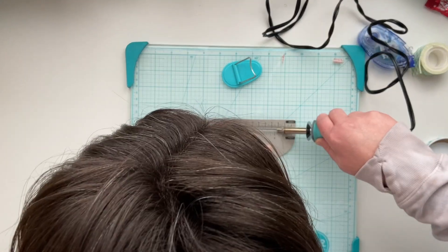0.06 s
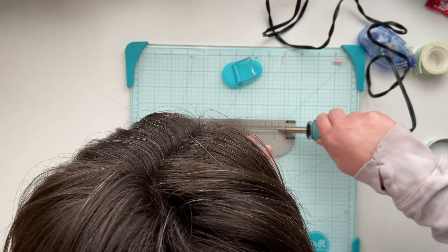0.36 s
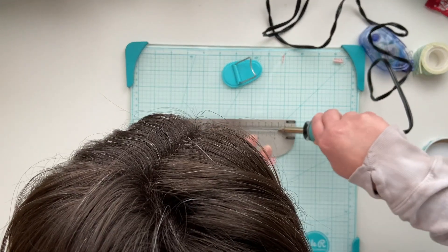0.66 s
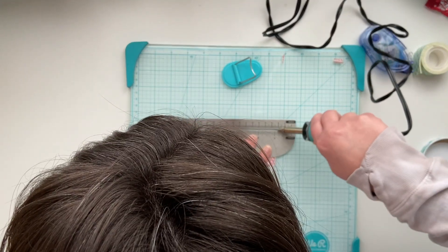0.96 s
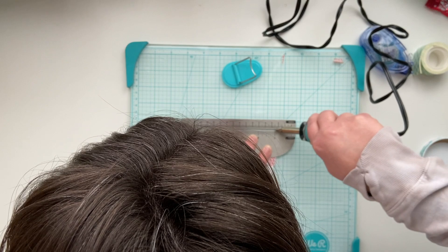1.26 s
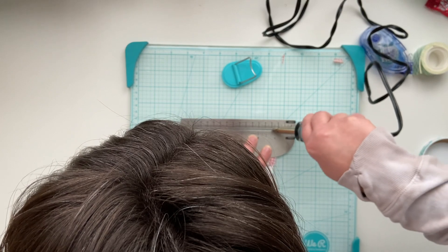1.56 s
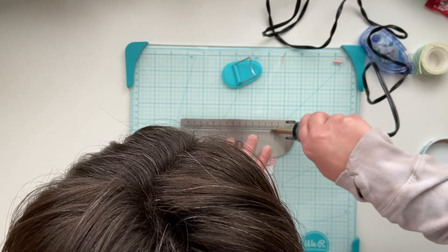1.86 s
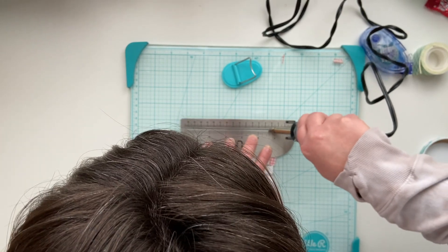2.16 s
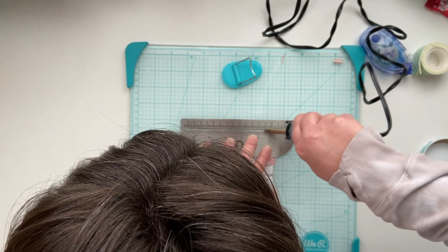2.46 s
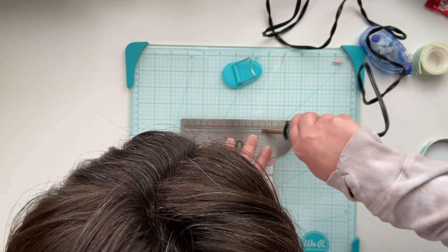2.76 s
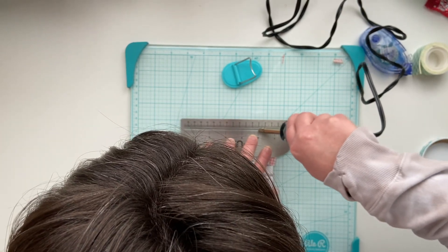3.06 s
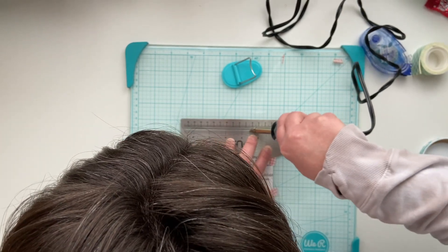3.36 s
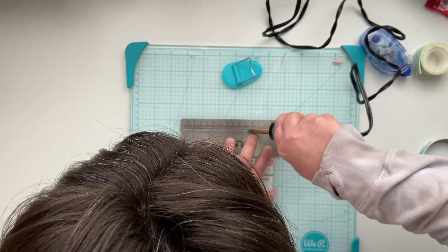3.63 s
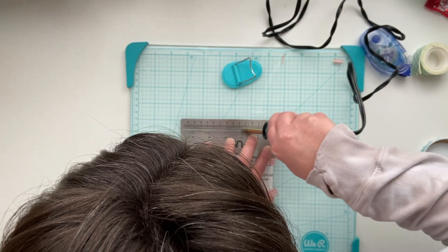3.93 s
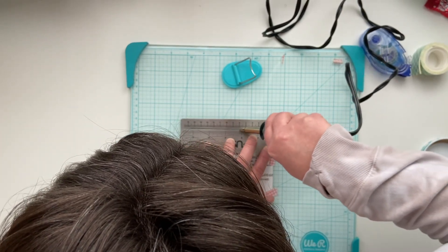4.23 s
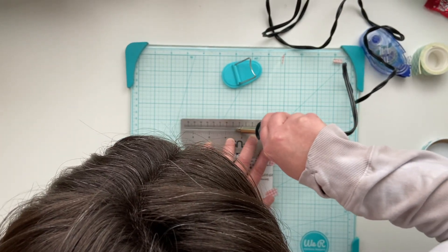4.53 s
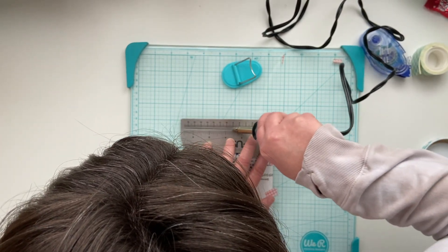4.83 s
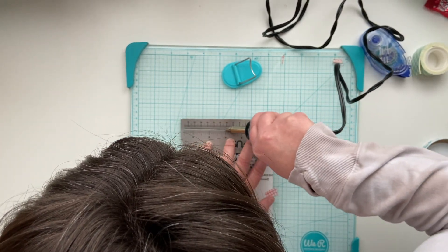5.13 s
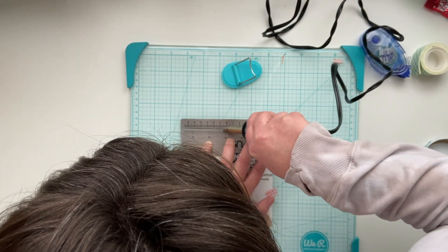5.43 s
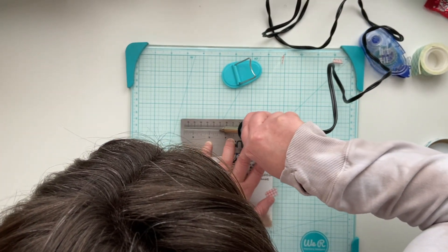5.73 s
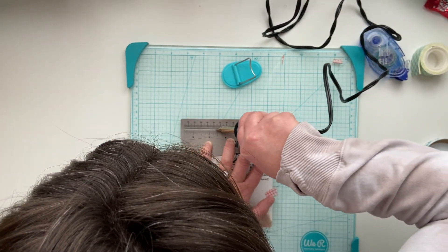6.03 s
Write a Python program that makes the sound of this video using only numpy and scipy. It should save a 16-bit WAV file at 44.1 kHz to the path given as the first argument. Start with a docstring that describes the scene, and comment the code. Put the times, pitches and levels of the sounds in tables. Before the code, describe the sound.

A handheld sealing tool is set against a steel ruler with a few sharp metal ticks and a soft bump. After faint rubbing, its toothed wheel rolls over plastic along the ruler's edge, making uneven clicks and short gritty scrapes, sometimes in quick spurts. Each click thumps the desk dully through a mat, and a few catches squeak briefly. The microphone is close, in a small quiet room.

```python
"""A desk in a small, quiet room, the microphone hanging close above it.
A heat-sealing tool is set down against a steel ruler, then its toothed wheel is pushed along over a
plastic pocket. Each tooth scrapes up to a slip, knocks the ruler and drops onto the mat, which thumps
the desk; at times the wheel runs in quick spurts. Rubs, squeaks and metal ticks sit over low room tone."""
import sys
import numpy as np
from scipy import signal
from scipy.fft import rfft, irfft, next_fast_len
from scipy.io import wavfile
from scipy.ndimage import uniform_filter1d, map_coordinates

SR = 44100
rng = np.random.default_rng(int(sys.argv[2]) if len(sys.argv) > 2 else 0)


def bounce(signal):
    """Save signal as a 16-bit WAV file at the path given by the first command-line argument."""
    frames = np.transpose(np.atleast_2d(signal))
    limited = np.clip(frames, -1, 1)
    pcm = np.round(limited * 32767).astype(np.int16)
    wavfile.write(sys.argv[1], SR, pcm)


N = 268779
AGE = np.arange(SR // 2) / SR  # seconds since a blow

# slips of the wheel's teeth: start_s, force_db
TOOTH_SLIPS = [(1.398, -41), (1.728, -34.5), (1.949, -33), (2.124, -29.5), (2.177, -28), (2.225, -28),
               (2.343, -34), (2.496, -31), (2.652, -27.5), (2.77, -29.5), (2.916, -28.5), (3.012, -26),
               (3.041, -29), (3.072, -30), (3.109, -29), (3.137, -26), (3.163, -28), (3.201, -27),
               (3.345, -33), (3.518, -34), (3.727, -29.5), (3.756, -32), (3.782, -25.5), (3.811, -27.5),
               (3.841, -27.5), (3.919, -35), (4.116, -28), (4.233, -30.5), (4.337, -30), (4.388, -31),
               (4.472, -31), (4.616, -30), (4.69, -33.5), (4.8, -32.5), (4.853, -29.5), (4.959, -31),
               (5.001, -29.5), (5.03, -25.5), (5.054, -26.5), (5.09, -31.5), (5.21, -33), (5.38, -30.5),
               (5.445, -32), (5.513, -31.5), (5.61, -31), (5.741, -30.5), (5.831, -32), (5.946, -34),
               (6.077, -28)]
# a tooth grinds along the ruler's edge and catches on it: start_s, level_db, pitch_hz
EDGE_CATCHES = [(1.726, -41.5, 1210), (2.1752, -23.5, 1120), (2.225, -31, 1130), (2.6515, -32.5, 1440),
                (3.0405, -23, 1060), (3.1625, -33, 1220), (3.7555, -23, 980), (3.8405, -26.5, 955),
                (4.336, -37.5, 1750), (4.6905, -26, 1040), (5.0303, -32.5, 1010), (5.6103, -39.5, 1300)]


def ruler():
    """Teeth knock the ruler, harder, sharper and lower at speed; catches and taps strike it outright."""
    # the tool taps against the ruler: start_s, level_db, pitch_hz
    taps = [(0.005, -43.5, 1140), (0.029, -36, 890), (0.229, -33.5, 1010), (0.24, -28.5, 834),
            (0.297, -47.5, 870), (0.458, -44, 1030), (0.679, -44, 1030), (1.332, -55, 1140),
            (4.082, -38.5, 1010)]
    out = np.zeros(N)
    for (s, force_db), speed in zip(TOOTH_SLIPS, wheel_speed()):
        blow = knock(pitch_hz=between(1220, 936, speed), octaves=0.48,
                     spill=between(0.32, 0.12, speed), attack_s=between(0.0016, 0.000205, speed))
        add(out, s - .001, amp(force_db + between(-17, -4.5, speed)) * blow)
    for s, db, pitch_hz in EDGE_CATCHES:
        add(out, s - .001, amp(db) * knock(pitch_hz, octaves=0.44, spill=0.11, attack_s=0.00098))
    for s, db, pitch_hz in taps:
        add(out, s - .0005, amp(db) * knock(pitch_hz, octaves=0.46, spill=0.16, attack_s=0.00014))
    return out


def knock(pitch_hz, octaves, spill, attack_s, rattle_db=0.5):
    """A blow favours the ruler's modes near one pitch and spills into the rest; the ruler chatters."""
    # the steel ruler lying on the mat: freq_hz, level_db, t60_s
    modes = [(281.4, -11.5, 0.1), (390.4, -1, 0.045), (504, -6, 0.047), (729, -2.5, 0.022),
             (817, -0.5, 0.019), (1045, -17.5, 0.01), (1099, -4, 0.023), (1140, -6, 0.029),
             (1474, -13, 0.038), (1520, -3, 0.0069), (1790, -4.5, 0.024), (2030, -8.5, 0.03),
             (2685, -22.5, 0.042), (3650, -16.5, 0.022), (4550, -48, 0.017)]
    hz = np.transpose(modes)[0]
    weight = spill + np.exp(-(np.log2(hz / pitch_hz) / octaves) ** 2)
    signs = (-1) ** np.arange(len(hz))
    body = (weight * signs) @ ring(modes, scatter_db=2.5, detune=0.022)
    jitter = unit(uniform_filter1d(rng.standard_normal(len(AGE)), size=96))
    chatter = uniform_filter1d(amp(rattle_db * jitter), size=24)
    onset = 1 - np.exp(-AGE / attack_s)
    return burst(body * chatter * onset, length_s=0.01)


def wheel_speed(spurt_gap_s=0.041, softness_s=0.0089):
    """Pace at each tooth, from 0 (creeping) to 1 (a spurt, where teeth follow closely)."""
    gaps = np.diff(np.transpose(TOOTH_SLIPS)[0], prepend=-np.inf, append=np.inf)
    nearest = np.minimum(gaps[:-1], gaps[1:])
    return .5 + .5 * np.tanh((spurt_gap_s - nearest) / softness_s)


def desk(rebound_s=0.01106, rebound_db=-24):
    """Each tooth thumps the desk through the soft mat, which springs back and bumps it again."""
    # the desk and mat: freq_hz, level_db, t60_s
    modes = [(25.45, -26.5, 0.43), (43.9, -28.5, 0.14), (77.4, -26.5, 0.13), (104, -72, 0.0684),
             (216, -28.5, 0.084), (293.5, -27, 0.095), (392, -25.5, 0.11), (472, -26, 0.13)]
    # the tool is set down on the mat: start_s, level_db
    landings = [(0.031, -51), (0.24, -35), (0.678, -49)]
    contacts_s = np.linspace(0.0017, 0.0013, len(TOOTH_SLIPS))  # the mat gives less along the way
    out = np.zeros(N)
    for (s, db), contact_s in zip(TOOTH_SLIPS, contacts_s):
        thump = pushed(ring(modes, scatter_db=1.0, detune=0.041).sum(0), contact_s)
        add(out, s - .001, amp(db) * burst(thump, length_s=0.058))
        rebound = pushed(ring(modes, scatter_db=7.5, detune=0.064)[4:].sum(0), contact_s=0.00054)
        add(out, s + rebound_s, amp(db + rebound_db) * burst(rebound, length_s=0.012))
    for s, db in landings:
        thump = pushed(ring(modes, scatter_db=7.0, detune=0.019)[2:].sum(0), contact_s=0.0019)
        add(out, s, amp(db) * burst(thump, length_s=0.022))
    return out


def friction(scrape_db=-9.5, hiss_db=-21.5):
    """Scrape and hiss swell before each tooth slips, in step with its force, and before each catch."""
    # colour of the scrape and the hiss, early and late in the wheel's run: freq_hz, density_db
    scrape_early = [(200, -1.5), (400, -7), (600, -4.5), (790, -2.5), (960, -1.5), (1190, 4), (1600, -13),
                    (1830, -0.5), (2050, -12.5), (2450, -20.5), (4000, -21.5), (7000, -46), (16000, -47)]
    scrape_late = [(200, -44), (400, -8), (600, -5.5), (790, 11), (980, -11), (1130, -9), (1430, 1.5),
                   (1750, -3), (2070, 3), (2600, -22), (4000, -15), (7000, -30), (16000, -52)]
    hiss_early = [(1500, -27), (2600, 11), (3100, 8.5), (3500, -11), (4400, 7.5), (5600, 0.5), (6600, -1),
                  (8500, -2), (10300, -4), (11500, -11), (13000, -8), (16000, -34)]
    hiss_late = [(1500, -52), (2800, 8.5), (3300, -21.5), (4400, -8.5), (5100, -7), (5700, 4), (6600, -8),
                 (8800, -8), (10400, -1), (11500, -14), (13000, -14), (16000, -20)]
    slip_s, force_db = np.transpose(TOOTH_SLIPS)
    catch_s, catch_db, _ = np.transpose(EDGE_CATCHES)
    speed = wheel_speed()
    rise_s = between(0.062, 0.051, speed)
    easing_db = -2.5 * speed  # a running wheel scrapes less
    graze = swells(catch_s, catch_db, rises_s=0.058, fall_s=.025, lead_s=.001)
    scrape_level = swells(slip_s, force_db + scrape_db + easing_db, rise_s, fall_s=0.072, lead_s=0.0036)
    hiss_level = swells(slip_s, force_db + hiss_db, rise_s, fall_s=0.036, lead_s=0.0003)
    scrape = patchy(sliding(scrape_early, scrape_late, grain_db=3.5), depth_db=3.5)
    hiss = patchy(sliding(hiss_early, hiss_late, grain_db=5.0), depth_db=3.5)
    return np.hypot(scrape_level, amp(-8) * graze) * scrape + np.hypot(hiss_level, amp(-29) * graze) * hiss


def swells(times_s, levels_db, rises_s, fall_s, lead_s):
    """Envelope of friction that peaks just ahead of each slip; rise and fall times span 60 dB."""
    t, power = np.arange(N) / SR, np.zeros(N)
    for s, db, rise_s in np.broadcast(times_s, levels_db, rises_s):
        near = slice(max(0, int(s * SR) - SR // 8), int(s * SR) + SR // 8)
        past_peak = t[near] - s + lead_s
        power[near] += amp(db - 60 * np.maximum(-past_peak / rise_s, past_peak / fall_s)) ** 2
    return np.sqrt(power)


def sliding(early, late, grain_db, midway_s=3.72, spread_s=0.47):
    """Grainy friction whose colour shifts as the wheel travels along the ruler."""
    travel = .5 + .5 * np.tanh((np.arange(N) / SR - midway_s) / spread_s)
    return np.sqrt(1 - travel) * noise(early, grain_db) + np.sqrt(travel) * noise(late, grain_db)


def patchy(x, depth_db):
    """Small resonances come and go as the contact point moves."""
    spectra = signal.stft(x, nperseg=512)[2]
    patches = uniform_filter1d(rng.standard_normal(spectra.shape), size=3, axis=0)
    patches = unit(uniform_filter1d(patches, size=12, axis=1))
    return unit(signal.istft(spectra * amp(depth_db * patches), nperseg=512)[1][:len(x)])


def rubbing(drag_db=-34.5, resting_db=-72):
    """The tool drags along the ruler: in light strokes, and whenever the wheel turns."""
    # light strokes: centre_s, level_db, half_width_s
    rubs = [(0.094, -54, 0.014), (0.333, -50, 0.017), (0.49, -51.5, 0.018), (0.676, -55, 0.056),
            (0.867, -51, 0.026), (1.072, -57.5, 0.075), (1.232, -48.5, 0.021), (1.274, -51, 0.012),
            (1.367, -51, 0.017), (1.846, -53.5, 0.012), (2.16, -46, 0.027), (2.992, -50, 0.067),
            (3.615, -50, 0.0097)]
    # colour of the rubbing, early and late in the run: freq_hz, density_db
    rub_early = [(200, -21.5), (450, 0), (620, -8.5), (790, 4.5), (950, -4), (1160, 3.5), (1420, -6),
                 (1640, -16), (1900, -5.5), (2350, -22.5), (3100, -17.5), (4300, -32), (5500, -23),
                 (16000, -53)]
    rub_late = [(200, -20), (450, 1.5), (620, -8), (790, 7.5), (950, -9.5), (1160, 2.5), (1420, -7.5),
                (1640, -3.5), (1900, -2), (2350, -20.5), (3100, -13), (4300, -27), (5500, -21.5),
                (16000, -67)]
    turning = np.max([amp(db + drag_db) * bump(s, half_width_s=.14) for s, db in TOOTH_SLIPS], axis=0)
    strokes = sum(amp(db) * bump(s, half_width_s) for s, db, half_width_s in rubs)
    level = np.sqrt(amp(resting_db) ** 2 + turning ** 2 + strokes ** 2)
    rub = sliding(rub_early, rub_late, grain_db=2)
    flutter = unit(amp(2.8 * wobble(rate_hz=90)))
    return level * rub * flutter


def squeaks(waver=0.047):
    """Stick and slip locks onto one resonance for a few cycles."""
    # brief squeaks and a low groan: centre_s, level_db, pitch_hz, half_width_s
    stick_slips = [(0.508, -44, 290, 0.018), (2.171, -33, 1150, 0.0039), (2.177, -12, 1160, 0.003),
                   (4.03, -44.5, 797, 0.0091), (4.959, -41, 2017, 0.0064), (5.608, -37.5, 1400, 0.0088)]
    out = np.zeros(N)
    t = AGE[:SR // 5] - .1
    for s, db, hz, half_width_s in stick_slips:
        drift = unit(uniform_filter1d(rng.standard_normal(len(t)), size=200))
        cycles = np.cumsum(hz * (1 + waver * drift)) / SR
        tone = np.sqrt(2) * np.sin(2 * np.pi * (cycles - cycles[len(t) // 2]))
        add(out, s + t[0], amp(db) * np.exp(-(t / half_width_s) ** 2) * tone)
    return out


def tip(snap_db=1, metal_db=-6):
    """Hard contacts give a dry snap and a brief bright ring of the tip."""
    # ticks of metal on metal: start_s, level_db
    clicks = [(0.0034, -36), (0.0248, -45.5), (0.228, -33), (0.2373, -28.5), (0.238, -37.5), (0.384, -57),
              (0.46, -59), (0.485, -56.5), (0.533, -59.5), (3.213, -55), (3.823, -53.5), (4.401, -60),
              (4.482, -54)]
    # the metal tip: freq_hz, level_db, t60_s
    modes = [(1920, -2, 0.013), (2700, -20, .012), (3060, 1, .015), (3650, -4, .014), (4500, -3, 0.017),
             (4750, 17, .018), (4780, -5, .014), (7050, 7, 0.066), (10200, -8, .015), (11900, -18, 0.023),
             (12000, -16, .022), (13400, -3, 0.031), (13700, 7, 0.024), (15300, -16, 0.017)]
    # colour of the snap: freq_hz, density_db
    snap_colour = [(400, -26), (900, 4.5), (1900, 5), (2500, -2.5), (3300, 4), (3900, -5), (4400, 3),
                   (5100, 2), (6200, -12), (9000, -10), (11500, -6.5), (12700, 2), (14000, -19),
                   (16000, -11)]
    out, grit = np.zeros(N), noise(snap_colour)
    decay = amp(-60 * AGE / 0.029) + amp(-11 - 60 * AGE / 0.04)
    for s, db in clicks:
        snap = np.roll(grit, -round(s * SR))[:len(AGE)] * decay
        metal = ring(modes, scatter_db=5, detune=0.00091).sum(0)
        add(out, s, amp(db + snap_db) * burst(snap, length_s=0.0042))
        add(out, s, amp(db + metal_db) * burst(metal, length_s=0.0022))
    return out


def room(x, wet_db, delay_s):
    """The small room's short diffuse answer, which shifts as the hands and head move."""
    # reverberation: freq_hz, t60_s
    decay_times = [(100, 0.59), (1000, 0.15), (4000, 0.21), (14000, 0.1)]
    out, block = np.zeros(N), SR // 4
    for start in range(0, N, block):
        hz, t, spectra = signal.stft(rng.standard_normal(SR // 3), SR, nperseg=256)
        decay = amp(-60 * t / along(decay_times, hz)[:, None])
        tail = signal.istft(spectra * decay, SR, nperseg=256)[1]
        answer = signal.fftconvolve(x[start:start + block], tail / np.linalg.norm(tail))
        add(out, start / SR + delay_s, answer)
    return amp(wet_db) * out


def room_tone():
    """Low rumble and a faint even hiss, with a low drone that dies away at the start."""
    # colour of each layer: freq_hz, density_db
    drone = [(25, -15), (50, -3), (75, 1), (110, -1.5), (160, -7), (200, -12.5), (280, -15.5), (450, -23.5),
             (1500, -54)]
    rumble = [(15, 10), (26, 7), (48, 5), (70, -2.5), (100, 0.5), (125, -14), (150, -4.5), (200, -12),
              (260, -16), (500, -22.5), (1500, -46)]
    air = [(30, 4), (250, 3.5), (600, 3.5), (1500, -4), (2500, -4.5), (5000, -9), (14000, -11.5),
           (16000, -14.5)]
    fade = bump(0, half_width_s=1)
    return amp(-50) * fade * noise(drone) + amp(-51.5) * noise(rumble) + amp(-65.5) * noise(air)


def ring(modes, scatter_db, detune):
    """One row per decaying mode, at strengths and pitches that vary from blow to blow."""
    hz, db, t60 = np.transpose(modes)[:, :, None]
    strength, shift = rng.standard_normal((2, len(modes), 1))
    envelope = amp(db + scatter_db * strength - 60 * AGE / t60)
    return envelope * np.cos(2 * np.pi * hz * (1 + detune * shift) * AGE)


def pushed(x, contact_s):
    """The answer to a force that peaks after contact_s and falls away."""
    progress = AGE[:SR // 40] / contact_s
    force = progress * np.exp(-progress)
    return signal.fftconvolve(x, force / force.sum())[:len(x)]


def noise(spectrum, grain_db=0):
    """Coloured noise of rms 1; grain breaks it into tiny catches."""
    grains = rng.standard_normal(N) * amp(grain_db * wobble(rate_hz=900))
    return unit(filtered(grains, lambda hz: amp(along(spectrum, hz))))


def wobble(rate_hz):
    """A smooth curve through random knots."""
    knots = rng.standard_normal(int(N * rate_hz / SR) + 4)
    return map_coordinates(knots, [np.arange(N) * rate_hz / SR])


def bump(centre_s, half_width_s):
    """A smooth swell, down to 1/e at half_width_s either side."""
    return np.exp(-((np.arange(N) / SR - centre_s) / half_width_s) ** 2)


def filtered(x, response):
    """Filter x by a gain given as a function of frequency."""
    size = next_fast_len(len(x) + 8192)
    return irfft(rfft(x, size) * response(np.fft.rfftfreq(size, 1 / SR)), size)[:len(x)]


def along(points, hz):
    """Interpolate (freq_hz, value) points on a log axis."""
    freqs, values = np.transpose(points)
    return np.interp(np.log(hz + 1), np.log(freqs + 1), values)


def between(slow, fast, speed):
    """Blend a creeping wheel's value into a running wheel's."""
    return slow + speed * (fast - slow)


def amp(db):
    """Decibels to gain."""
    return 10 ** (np.asarray(db) / 20)


def unit(x):
    """Scale to rms 1."""
    return x / np.sqrt(np.mean(x ** 2) + 1e-20)


def burst(x, length_s):
    """Scale a hit to the energy of rms 1 held for length_s."""
    return x * np.sqrt(length_s * SR / np.sum(x ** 2))


def add(track, start_s, sound):
    """Mix a sound into the track."""
    start = max(0, round(start_s * SR))
    part = track[start:start + len(sound)]
    part += sound[:len(part)]


def scene():
    """The tool up close with a little of the room, over the thumping desk and the room tone."""
    tool = ruler() + friction() + rubbing() + squeaks() + tip()
    return (tool + room(tool, wet_db=-14.0, delay_s=0.0046) + desk() + room_tone())[None]


def record(dry, low_hz=8, top_hz=15850):
    """The mono microphone sheds the deepest bass and keeps nothing above its band limit."""
    return filtered(dry[0], lambda hz: (hz < top_hz) * hz ** 2 / (hz ** 2 + low_hz ** 2))[None]


dry = scene()
out = record(dry)
bounce(out)
```